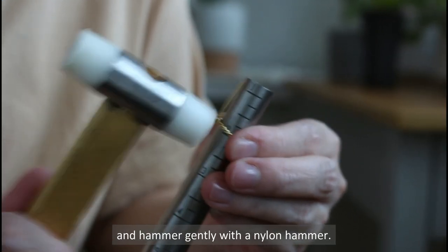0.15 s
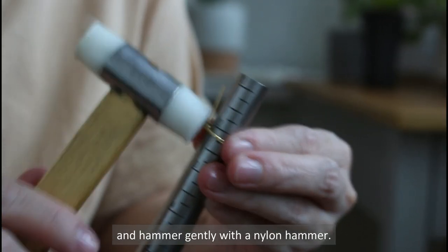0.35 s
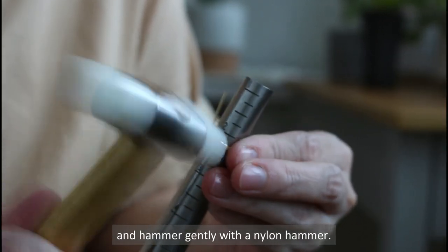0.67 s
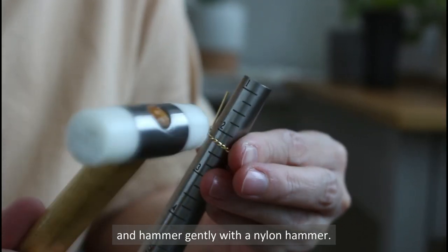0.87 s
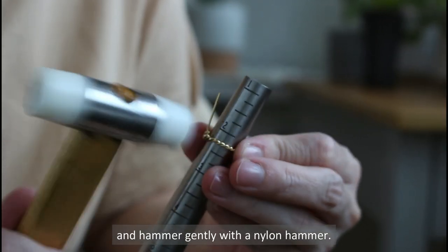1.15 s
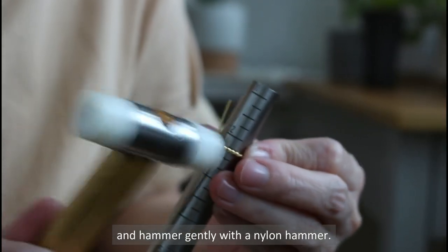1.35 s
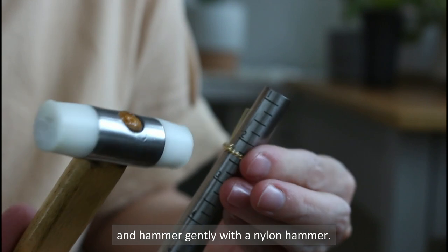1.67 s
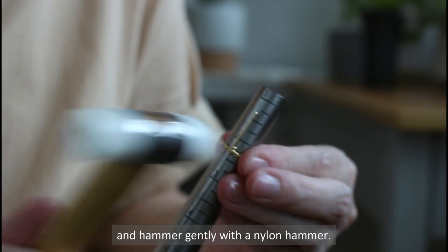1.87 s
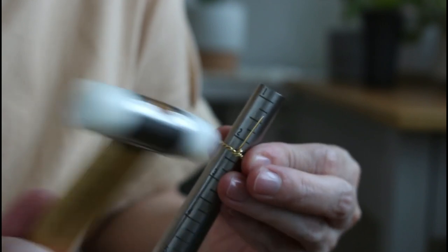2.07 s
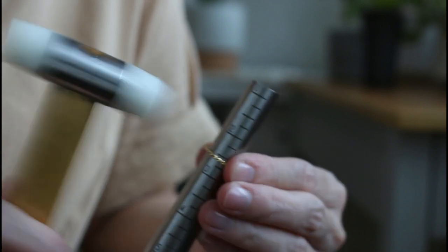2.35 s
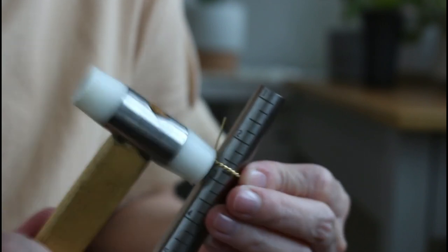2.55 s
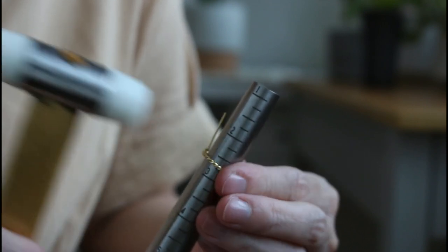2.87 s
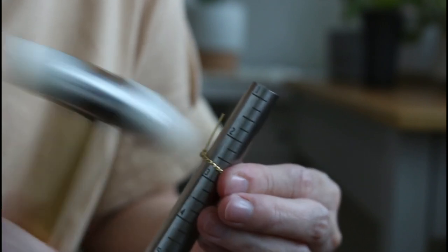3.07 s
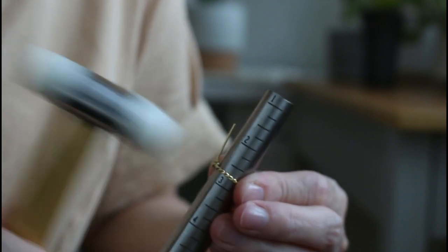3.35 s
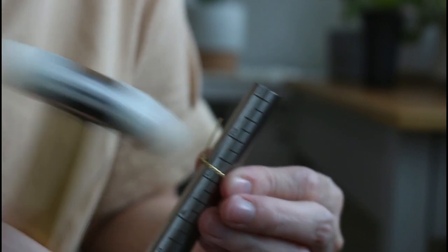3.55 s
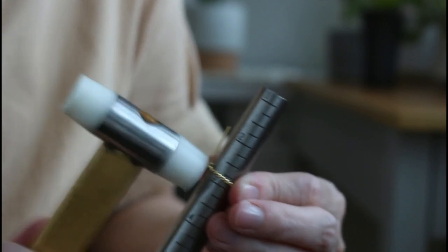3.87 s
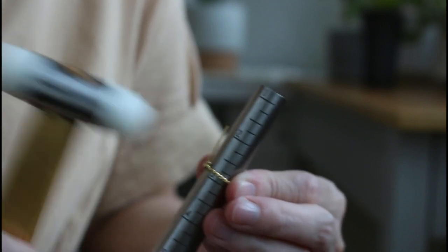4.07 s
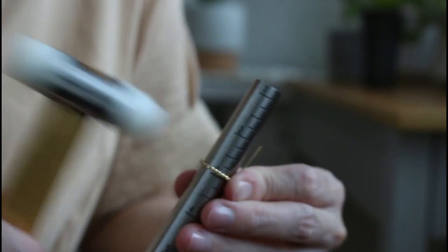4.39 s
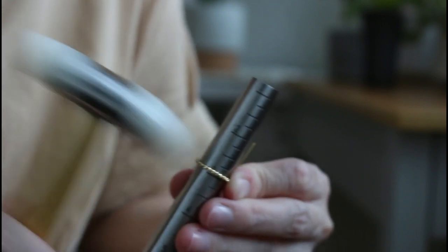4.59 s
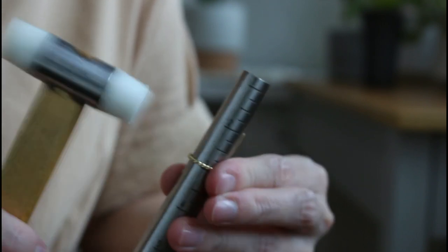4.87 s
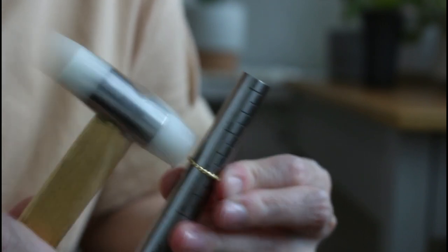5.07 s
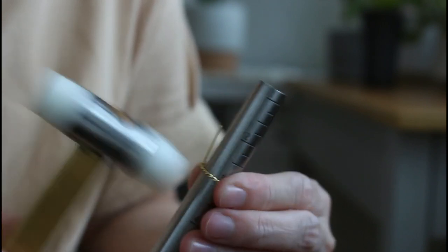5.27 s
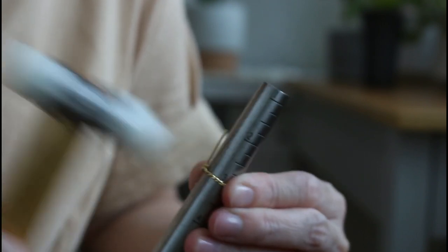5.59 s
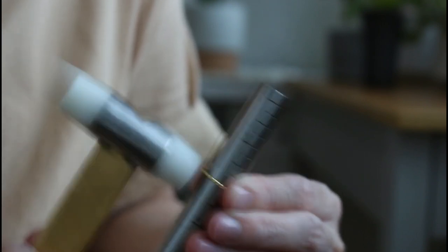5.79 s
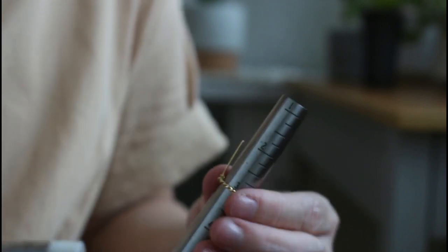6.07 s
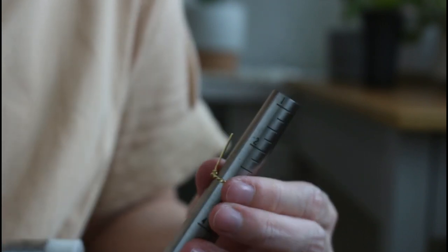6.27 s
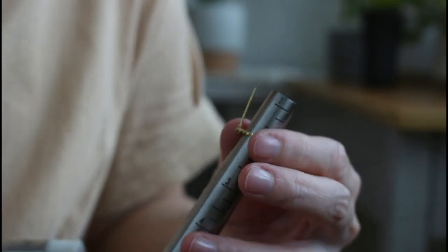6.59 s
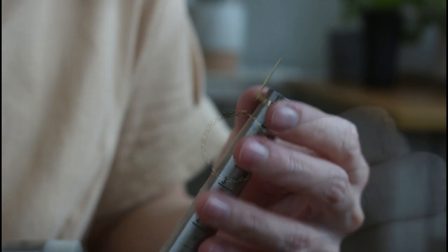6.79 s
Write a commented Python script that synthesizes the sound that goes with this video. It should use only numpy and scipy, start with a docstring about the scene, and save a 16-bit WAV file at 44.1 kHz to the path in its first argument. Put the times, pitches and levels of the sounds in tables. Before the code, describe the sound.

Fast, close, dry clacking of a plastic-faced hammer on a steel mandrel with short metallic ring, one brief pause, ending in quiet rubbing.

```python
"""Hammer taps on a steel mandrel

A nylon hammer taps a brass hoop on a hand-held steel mandrel in a small workroom. Each blow swells in:
shaped noise for crack and wash, decaying sines for the short steel ring. All sound drops out at times.
Room noise, rumble and wavering tones lie under it; afterwards fingers slide the hoop (noise bands,
faint resonances) while a low sine swells."""
import sys
import numpy as np
from scipy import signal
from scipy.fft import rfft, irfft
from scipy.io import wavfile
from scipy.ndimage import uniform_filter1d

SR = 44100
rng = np.random.default_rng(int(sys.argv[2]) if len(sys.argv) > 2 else 0)


def file_out(sig):
    """Save sig as 16-bit WAV at sys.argv[1]."""
    # one column per channel
    cols = np.atleast_2d(sig).T
    # limit, then scale
    lim = np.clip(cols, -1, 1)
    pcm = np.round(lim * 32767).astype(np.int16)
    wavfile.write(sys.argv[1], SR, pcm)


N = 305914

# Hammer blows: (time [s], knock [dB], treble re knock [dB], first mode [dB], second mode [dB],
# wash re knock [dB], swell [ms])
BLOWS = [(0.089, -53.5, -8, -48, -52, 5, 4.9), (0.148, -53.5, -12.5, -48, -43, 7.5, 4.7),
         (0.213, -38.5, -14.5, -44.5, -25.5, -4.5, 5.4), (0.2574, -45, -4, -54, -33.5, -11, 3.2),
         (0.3027, -49, -2, -51, -46, -12, 7.2), (0.355, -61.5, 0, -49, -50, -10, 7.4),
         (0.413, -63.5, 7, -57, -76, -17, 4.7), (0.4582, -47, -8.5, -51, -70, -10, 4.2),
         (0.5199, -38, -17.5, -34, -25.5, -3.5, 3.7), (0.5777, -29, -7.5, -24, -25, -6, 3.9),
         (0.6336, -39.5, -12.5, -31, -20, -1.5, 6.6), (0.681, -38.5, -8, -31.5, -22, -3.5, 4.6),
         (0.7399, -31.5, -7, -24.5, -15, -5.5, 3.7), (0.795, -43, -9, -29, -24.5, -2.5, 5.9),
         (0.8506, -32, -11, -28, -21, -14, 3.7), (0.9036, -67, 13, -37.5, -37.5, -12, 4.6),
         (0.9483, -45.5, -4, -32.5, -27, -6, 2.1), (1.0144, -36.5, -9.5, -33, -20.5, -7.5, 5.9),
         (1.0686, -27, -5.5, -36, -16, -9.5, 3.7), (1.1237, -40, -11, -39.5, -23.5, -4.5, 6.4),
         (1.1783, -42.5, -9, -48, -36, -16, 2.2), (1.2281, -42.5, -6.5, -59, -67, -16, 1.9),
         (1.2942, -41.5, -9, -52, -43, -12, 6.1), (1.3387, -37, -10.5, -42.5, -44, -8, 3.2),
         (1.399, -31.5, -12.5, -43.5, -62, -17.5, 3.8), (1.4459, -44, -9, -47, -40, -1.5, 3.7),
         (1.512, -30, -13, -52, -43, -16, 5.3), (1.5577, -36.5, -9.5, -42, -39.5, -10, 4),
         (1.8834, -66.5, 11.5, -59, -67, -7.5, 1.5), (1.948, -45.5, -4, -46, -35.5, -14, 4),
         (1.9998, -73, 25.5, -51, -78, -14, 2.7), (2.063, -42, -7, -41, -29, -9, 5.9),
         (2.122, -34, -8, -44, -27, -9.5, 4.8), (2.1726, -31.5, -5.5, -33, -17, -10, 4.2),
         (2.2288, -38, -11, -34, -18.5, 0.5, 5.2), (2.2865, -28, -10.5, -27.5, -15, -6, 4.6),
         (2.329, -53, -10, -58, -53, -8, 11), (2.358, -46, -13, -33.5, -31.5, 5.5, 5.1),
         (2.4179, -64, -18, -32.5, -31.5, 18, 4.4), (2.4842, -35.5, -19, -36.5, -25, -1, 6.2),
         (2.5428, -26, -19, -34.5, -22.5, -6.5, 5.8), (2.599, -24, -12.5, -28.5, -25.5, -8, 5.4),
         (2.6533, -30, -13.5, -27, -29.5, -5.5, 4.4), (2.9586, -27, -12, -33.5, -24.5, -8.5, 4.8),
         (3.0103, -50, -23, -29, -26, 12, 3.3), (3.0805, -38.5, -16.5, -34, -38, -9, 4.4),
         (3.143, -34, -14.5, -39.5, -33, -4, 5.2), (3.1953, -33, -16.5, -37.5, -41, -1.5, 3.3),
         (3.2585, -33, -13, -60, -43, -10.5, 2.6), (3.3173, -28.5, -16.5, -46, -41, -5.5, 3),
         (3.381, -40.5, -11, -40.5, -40, 2, 5.2), (3.4364, -39.5, -8, -44.5, -36, 5.5, 4.6),
         (3.504, -29.5, -16, -40.5, -54, -6, 8.8), (3.557, -24, -20.5, -40.5, -51, -14, 4),
         (3.6196, -24, -15.5, -41.5, -58, -10, 4.4), (3.675, -37.5, -12, -33.5, -50, 4.5, 2.7),
         (3.7355, -41, -7, -41, -34, 7, 4.8), (3.8014, -42, -6.5, -38.5, -37, 5.5, 5.5),
         (3.8538, -36, -10, -30, -36, -3.5, 1.2), (3.916, -37.5, -9, -36.5, -35.5, 1, 2.3),
         (3.983, -34.5, -11, -47, -50, -3.5, 6.3), (4.0446, -36.5, -17.5, -34.5, -64, -9, 8.9),
         (4.102, -31.5, -6.5, -38, -35.5, -7, 5.7), (4.1604, -25, -9.5, -34, -33.5, -11, 4.2),
         (4.2234, -26.5, -9.5, -35, -48, -12.5, 5.9), (4.275, -28.5, -13, -36, -53, -11.5, 3.5),
         (4.3256, -51, -13, -46, -47, -10, 6.5), (4.3566, -26.5, -12.5, -31, -58, -12, 3.9),
         (4.4139, -31.5, -17, -34, -41.5, -4, 4.3), (4.4816, -34.5, -20, -38.5, -49, -8.5, 5.9),
         (4.5364, -38, -15.5, -39, -70, -2.5, 3.2), (4.6008, -41, -9.5, -37, -74, -9, 3.4),
         (4.659, -27, -25, -35.5, -68, -10, 4), (4.7187, -29, -13.5, -32, -75, -13, 3.7),
         (4.7767, -30.5, -17, -57, -72, -16, 3.5), (4.829, -49, 4, -38, -68, -8, 3.1),
         (4.8912, -42, -12, -43, -44, -9.5, 5), (4.9519, -35, -14, -36, -60, -11, 5.3),
         (5.012, -43.5, -17, -42.5, -43, -1.5, 6), (5.073, -32, -16, -34.5, -71, -9.5, 5.6),
         (5.1325, -59.5, -12, -38, -78, 5.5, 4.9), (5.1812, -52, -17, -34, -76, 7, 3.3),
         (5.2611, -27, -34, -43, -78, -16, 3), (5.3162, -34, -11, -34, -58, 3, 3.5),
         (5.378, -40.5, -10.5, -36, -45, 6.5, 7.8), (5.4364, -44.5, -7, -34.5, -40, 9.5, 5.1),
         (5.4959, -57.5, -7.5, -38.5, -45, 14.5, 5.5), (5.5571, -49, -6, -33, -76, 5, 2.7),
         (5.6117, -41.5, -11.5, -39, -40, 2.5, 2.8), (5.6786, -42, -11, -39, -48, 0.5, 5.7),
         (5.735, -33.5, -10.5, -39.5, -59, -4.5, 4.5), (5.788, -26, -6.5, -35.5, -34.5, -6, 2.3),
         (5.8536, -28, -4.5, -39, -42, -8, 6.3)]
# Tone drift as grip and striking spot move, for a firm blow: (time [s], third mode [dB], upper modes [dB],
# knock near 1.6 kHz [dB], knock near 3 kHz [dB])
GRIP_DRIFT = [(0.1, -39.5, -68, -12, -5.5), (0.3, -54, -67, 1, -1.5), (0.6, -48, -79, -1, 6),
              (1.0, -60, -58.5, 1.5, 8.5), (1.3, -67, -70, -10.5, 8), (1.55, -57.5, -63, 0, -1),
              (2.099, -52.5, -57, 1.5, 12), (2.45, -38, -56, -4.5, -1.5), (2.7, -59, -51, 1.5, 1),
              (3.15, -37, -50.5, -6, 2), (3.55, -49, -53, -7, 1), (3.9, -44, -65, -5, 1),
              (4.25, -50.5, -57, 0, 1), (4.6, -34, -43.5, 1, -7), (5.1, -43, -56, 4, -8),
              (5.3, -52, -67, -6.5, -2), (5.6, -29, -46, 0, 3), (5.86, -50, -52, -4, 2)]
# Mandrel bending modes: (frequency [Hz], family, level re family [dB], t60 [s], left re right [dB])
MANDREL_MODES = [(978.5, "first", -2.5, 0.18, -6.5), (973.3, "first", -13, 0.044, -18.5),
                 (2502.3, "second", -2.5, 0.16, -5.5), (2385, "second", -18.5, 0.069, -6),
                 (4690, "third", -1.5, 0.14, -5.5), (7580, "upper", 1.5, .11, -2),
                 (10800, "upper", -6, 0.076, -3.5), (14600, "upper", -20, .08, -4.5)]
# Uneven ring of the held steel: family -> level spread [dB]
FLUTTER_DB = {"first": 2, "second": 1, "third": 3.5, "upper": 3.5}
# Ring swell time over knock swell time: family -> ratio
RING_SWELL_RATIOS = {"first": 2.32, "second": 1.48, "third": 2.04, "upper": 1.87}
# Knock spectrum shape: (frequency [Hz], relative density [dB per Hz])
KNOCK_SPECTRUM = [(290, -100), (500, -24), (876, -22), (968, -5), (1100, -9), (1990, -7.5), (2430, -8.5),
                  (3330, -15.5), (4570, -9), (6360, -10.5), (7240, -14.5), (11000, -14), (15500, -37)]
# Dropouts: (time [s], fade-back [s])
DROPOUTS = [(0.267, 0.013), (2.307, 0.008), (4.309, 0.022), (5.187, 0.018), (5.948, 0.016)]
# Sliding noise spectrum shape: (frequency [Hz], relative density [dB per Hz])
SLIDE_SPECTRUM = [(290, -29), (500, -11.5), (716, -10.5), (968, -9.5), (1240, -6), (3380, -22.5),
                  (4070, -20.5), (7560, -27), (8720, -28.5), (15500, -38)]
# Sliding noise: (time [s], rub [dB], hiss [dB])
SLIDE_LEVELS = [(5.95, -46, -81), (5.96, -53.5, -65.5), (6.04, -57, -72.5), (6.2, -60.5, -72),
                (6.43, -54, -72), (6.47, -54.5, -64.5), (6.6, -58.5, -71.5), (6.94, -60.5, -71)]
# Resonances in the scrape: (frequency [Hz], width [Hz], level [dB])
SCRAPE_RINGS = [(2611, 60, -81), (3300, 80, -82), (4712, 50, -87), (7620, 120, -82)]
# Room noise spectrum shape: (frequency [Hz], relative density [dB per Hz])
ROOM_SPECTRUM = [(15, -57.5), (25, -40), (79, -15.5), (116, -8.5), (183, -3), (209, -6), (289, -5.5),
                 (523, -9.5), (567, -11.5), (722, -8.5), (1020, -12.5), (1170, -12.5), (15500, -52.5)]
# Room noise: (time [s], level [dB])
ROOM_LEVELS = [(0.0, -68.5), (0.85, -64.5), (1.65, -67.5), (2.7, -62.5), (5.02, -69.5), (5.25, -60.5),
               (5.8, -66), (6.15, -62), (6.4, -64.5), (6.94, -60)]
# Wavering hum: (time [s], level [dB])
HUM_LEVELS = [(0.0, -77.5), (0.5, -69.5), (0.8, -61.5), (1.1, -80), (1.7, -67), (2.4, -67.5), (2.7, -72.5),
              (3.15, -53.5), (3.5, -68.5), (3.8, -65), (4.7, -64), (5.12, -67), (5.25, -56), (5.7, -70),
              (6.1, -78), (6.36, -53), (6.57, -74), (6.94, -59)]
# Faint wavering room tones: (frequency [Hz], width [Hz], level [dB])
DRONES = [(366, 9.8, -79.5), (408.2, 31, -73.5), (111, 24, -73.5)]
# Low tone: (time [s], level [dB])
LOW_TONE_LEVELS = [(6.02, -100), (6.2, -66), (6.42, -63), (6.59, -59), (6.645, -74), (6.68, -100)]

LOW_HZ, TREBLE_HZ = 2500, 6500  # band that sets the knock level
CRACK_T60_S, WASH_T60_S = 0.0096, 0.28
TICK_DB, TICK_T60_S = -6, 0.012  # tick fades both ways from the peak
KNOCK_PEAK_S, RING_PEAK_S, LONGEST_S = 0.003, 0.008, 0.089  # after the blow time
KNOCK_PAN_DB, LOW_KNOCK_PAN_DB = -1.5, -2  # left re right; the second adds below LOW_HZ
RIPPLE_DB, RIPPLE_HZ = 3.5, 350  # random colour of each knock: spread, spacing
DETUNE_RATIO, PHASE_SPREAD_RAD = 0.002, 1.0  # pitch scatter from the grip; phase scatter per side
FIRM_DB, RING_SPREAD_DB = -33, 1
# Per dB of knock above firm: light blows sound duller and barely wake the high modes
LOW_SLOPE_DB_PER_DB, RING_SLOPE_DB_PER_DB = -0.38, 0.4
WASH_TO_RING_DB_PER_DB = 0.3  # blows that linger ring the higher modes more
SCRAPE_RISE_S = 6.45, 6.7  # rings grow in between
HUM_HZ, HUM_WIDTH_HZ, LOW_TONE_HZ = 180.5, 9, 65
RUMBLE_DB, MURMUR_DB = -84.5, 3.5  # rumble level; spread of the room's low bands
TOP_HZ = 15740


def hammer(size=8192, lead=2048):
    """Nylon on brass over steel: noise knocks, each with the mandrel's bending modes; size, lead in samples."""
    out = np.zeros((2, N + 2 * size))
    t = (np.arange(size) - lead) / SR
    hz, noise = colour(KNOCK_SPECTRUM, size, band=(LOW_HZ, TREBLE_HZ), rows=(len(BLOWS), 2))
    noise = noise * np.where(hz < LOW_HZ, sides(LOW_KNOCK_PAN_DB), 1)
    flutter = {family: undb(db * walk(count=500)) for family, db in FLUTTER_DB.items()}
    grip = np.array(GRIP_DRIFT).T
    next_times_s = [blow[0] for blow in BLOWS[1:]] + [N / SR]
    for blow, spectrum, next_s in zip(BLOWS, noise, next_times_s):
        s, knock_db, treble_db, first_db, second_db, wash_db, swell_ms = blow
        third_db, upper_db, low_db, middle_db = (np.interp(s, grip[0], column) for column in grip[1:])
        force_db = knock_db - FIRM_DB
        swell_s = max(swell_ms, 0.5) / 1000
        start = int(s * SR)

        low_db += LOW_SLOPE_DB_PER_DB * force_db
        tilt_db = np.interp(np.log(hz), np.log([1640, 3000, 4070, 8360]), [low_db, middle_db, 0, treble_db])
        sound = knock(t, hz, spectrum, tilt_db, knock_db, wash_db, swell_s)

        high_db = RING_SLOPE_DB_PER_DB * force_db + WASH_TO_RING_DB_PER_DB * wash_db
        third_db += high_db + RING_SPREAD_DB * rng.standard_normal()
        upper_db += high_db + RING_SPREAD_DB * rng.standard_normal()
        drive_db = {"first": first_db, "second": second_db, "third": third_db, "upper": upper_db}
        blow_flutter = {family: gain[start:start + size] for family, gain in flutter.items()}
        sound += mandrel(t, drive_db, swell_s, next_s - s, blow_flutter)

        # nothing rings on through a dropout
        sound *= t < min(cut_s - s for cut_s, _ in DROPOUTS if cut_s > s)
        out[:, start:start + size] += sound
    return out[:, lead:lead + N]


def knock(t, hz, spectrum, tilt_db, knock_db, wash_db, swell_s):
    """Contact noise: a smeared crack and tick, then the walls' wash, coloured by how the face lands."""
    after = np.maximum(t, 0)
    knots_hz = np.arange(0, SR / 2, RIPPLE_HZ)
    ripple_db = np.interp(hz, knots_hz, RIPPLE_DB * rng.standard_normal(len(knots_hz)))
    noise = irfft(spectrum * undb(tilt_db + ripple_db))
    rise = np.exp(np.minimum(t - KNOCK_PEAK_S, 0) / swell_s)
    tick = undb(TICK_DB - 60 * np.abs(t - KNOCK_PEAK_S) / TICK_T60_S)
    crack = undb(-60 * after / CRACK_T60_S)
    wash = undb(wash_db - 60 * after / WASH_T60_S)
    end = np.cos(np.pi / 2 * np.clip(after / LONGEST_S, 0, 1))
    return sides(KNOCK_PAN_DB) * undb(knock_db) * noise * rise * (tick + crack + wash) * end


def mandrel(t, drive_db, swell_s, gap_s, flutter):
    """Bending modes of the held steel: decaying sines that swell in softly."""
    after = np.maximum(t, 0)
    # silent 3 ms before the next blow
    ring_s = min(max(gap_s - 0.003, 0.02), LONGEST_S)
    end = np.cos(np.pi / 2 * np.clip(after / ring_s, 0, 1) ** 2.5)
    out = np.zeros((2, len(t)))
    for mode_hz, family, db, t60_s, pan_db in MANDREL_MODES:
        bent_hz = mode_hz * (1 + DETUNE_RATIO * rng.standard_normal())
        # two microphones catch each mode at somewhat different phases
        phase = rng.random() * 2 * np.pi + PHASE_SPREAD_RAD * rng.standard_normal((2, 1))
        rise_s = RING_SWELL_RATIOS[family] * swell_s
        swell = np.exp(-0.5 * (np.minimum(t - RING_PEAK_S, 0) / rise_s) ** 2)
        decay = undb(drive_db[family] + db - 60 * after / t60_s)
        ring = np.sin(2 * np.pi * bent_hz * t + phase) * decay
        out += sides(pan_db) * swell * ring * end * flutter[family]
    return out


def fingers():
    """The hoop slides up the steel: an uneven rub, a thin hiss, and faint rings as it scrapes."""
    hz, noise = colour(SLIDE_SPECTRUM, N, band=(800, 3000), rows=(2,))
    rub = irfft(noise * (hz < 3500), N) * undb(curve(SLIDE_LEVELS, 1, -120) + 2.5 * walk(count=170))
    hiss = irfft(noise * (hz >= 3500), N)
    hiss = hiss / hiss.std() * undb(curve(SLIDE_LEVELS, 2, -120))
    rings = sum(narrow(ring_hz, width_hz, db + 5 * walk(count=55)) for ring_hz, width_hz, db in SCRAPE_RINGS)
    rings = rings * np.interp(np.arange(N) / SR, SCRAPE_RISE_S, [0, 1])
    return sides(-2.4) * (rub + hiss + rings)


def room():
    """Air noise, rumble, hum and drones as random bands, with a low sine that swells and stops."""
    rumble = narrow(60, 70, RUMBLE_DB + 4.5 * walk(count=50))
    hum = narrow(HUM_HZ, HUM_WIDTH_HZ, curve(HUM_LEVELS, 1) + 0.83 * walk(count=40))
    drones = sum(narrow(hz, width_hz, db + 4.1 * walk(count=35)) for hz, width_hz, db in DRONES)
    tone = np.sin(2 * np.pi * LOW_TONE_HZ * np.arange(N) / SR) * undb(curve(LOW_TONE_LEVELS, 1, -120))
    return sides(-4.0) * (air() + rumble + hum + drones) + sides(-3.0) * tone


def air():
    """Room noise whose bands below 700 Hz flicker independently."""
    hz, noise = colour(ROOM_SPECTRUM, N, band=(250, 750), rows=(2,))
    edges_hz = [0, 150, 300, 450, 700, SR]
    out = np.zeros((2, N))
    for lo_hz, hi_hz in zip(edges_hz, edges_hz[1:]):
        band = irfft(noise * ((hz >= lo_hz) & (hz < hi_hz)), N)
        spread_db = MURMUR_DB if hi_hz < SR else 0
        out += band * undb(spread_db * walk(count=40))
    return out * undb(curve(ROOM_LEVELS, 1) + 0.74 * walk(count=60))


def colour(points, size, band, rows):
    """Bin frequencies and spectra of unrelated noises of the given shape, rms 1 inside band [Hz]."""
    hz = np.maximum(np.arange(size // 2 + 1) * SR / size, 1)
    points_hz, points_db = np.array(points).T
    gain = undb(np.interp(np.log(hz), np.log(points_hz), points_db))
    inside = (hz > band[0]) & (hz < band[1])
    gain = gain / np.sqrt(np.sum(gain[inside] ** 2) / len(hz))
    return hz, rfft(rng.standard_normal((*rows, size))) * gain


def narrow(hz, width_hz, db):
    """Noise in one resonance: a tone that wavers."""
    edges_hz = [hz - width_hz / 2, hz + width_hz / 2]
    bandpass = signal.butter(2, edges_hz, "bandpass", fs=SR, output="sos")
    tone = signal.sosfilt(bandpass, rng.standard_normal((2, N)))
    return tone / tone.std() * undb(db)


def walk(count):
    """Smooth random levels, count steps in all, spread near 1."""
    step = N // count + 1
    levels = np.repeat(rng.standard_normal(count), step)
    smooth = uniform_filter1d(uniform_filter1d(levels, step), step)
    return 1.3 * smooth[:N]  # makes up for spread lost in smoothing


def curve(table, column, outside=None):
    """One column of a table at every sample."""
    rows = np.array(table)
    return np.interp(np.arange(N) / SR, rows[:, 0], rows[:, column], outside, outside)


def sides(pan_db):
    """Left and right gains, pan_db apart."""
    return undb(np.array([[pan_db / 2], [-pan_db / 2]]))


def undb(db):
    """Decibels to gain."""
    return 10 ** (np.asarray(db) / 20)


def scene():
    """Hammer, fingers and room, silenced at each dropout: a near-instant cut, then a short fade back."""
    t, gate = np.arange(N) / SR, np.ones(N)
    for cut_s, back_s in DROPOUTS:
        gate *= np.clip(np.where(t < cut_s, (cut_s - t) / 0.00027, (t - cut_s) / back_s), 0, 1)
    return (hammer() + fingers() + room()) * gate


def record(dry):
    """Steep low-pass: the recorder cuts the top."""
    return signal.sosfilt(signal.ellip(10, 0.2, 60, TOP_HZ, fs=SR, output="sos"), dry)


dry = scene()
out = record(dry)
file_out(out)
```